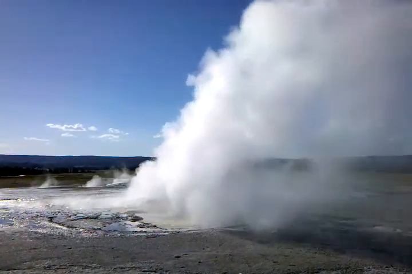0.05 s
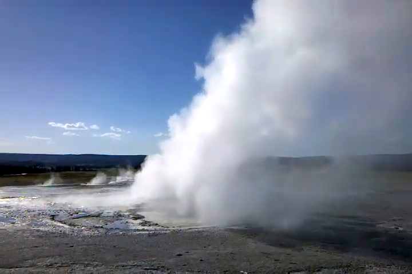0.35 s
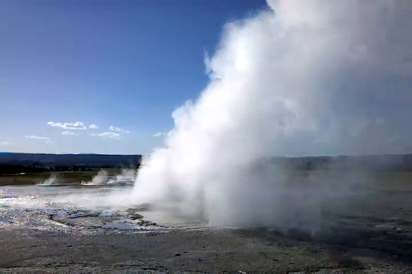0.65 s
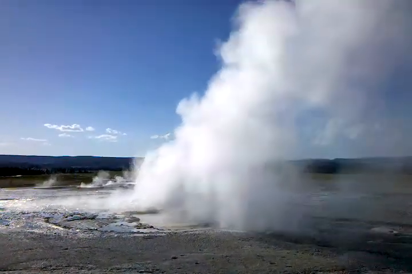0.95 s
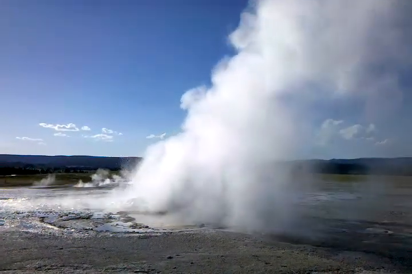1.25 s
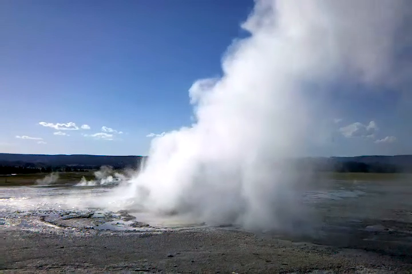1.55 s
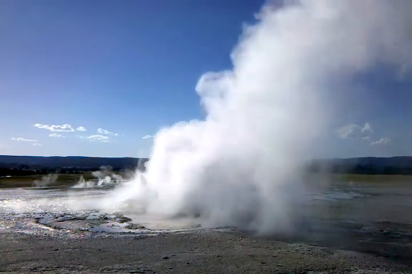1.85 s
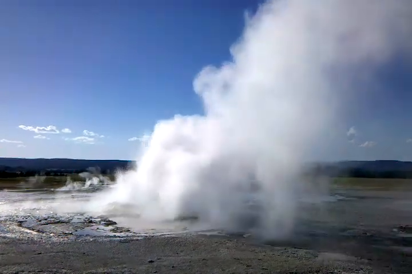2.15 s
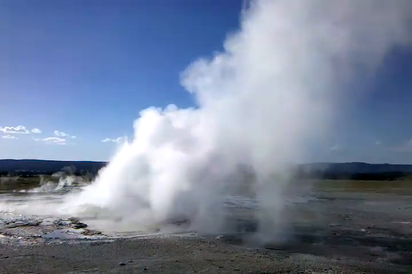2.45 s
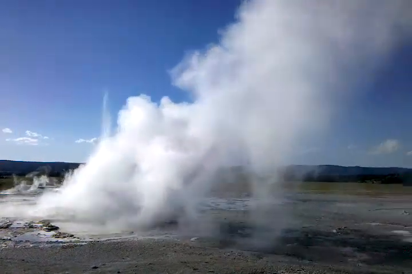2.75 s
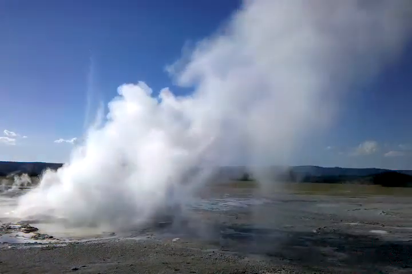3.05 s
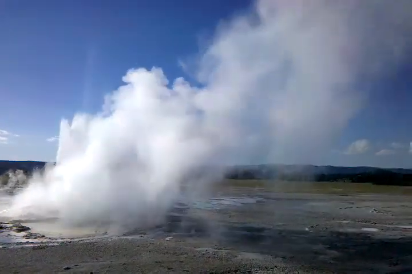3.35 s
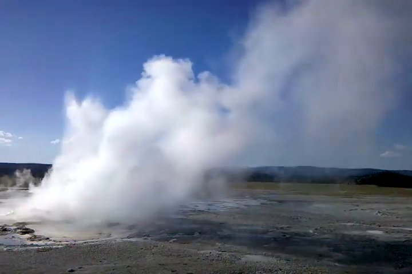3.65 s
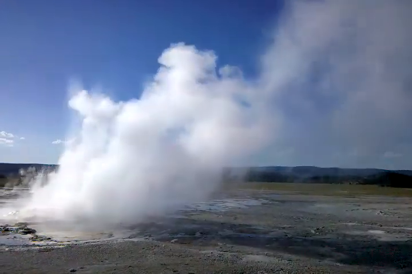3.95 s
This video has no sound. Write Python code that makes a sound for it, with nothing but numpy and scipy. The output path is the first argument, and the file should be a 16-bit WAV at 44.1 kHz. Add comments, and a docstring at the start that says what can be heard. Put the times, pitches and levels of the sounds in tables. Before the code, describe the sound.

A geyser rushes with steam and spray while water splats and wind buffets the microphone.

```python
"""A geyser erupts across a bare sinter flat: steam and spray rush from the vent in slow surges.
The ground mirrors the rush, a hollow colour that drifts as the listener moves.
Thrown water splats down, and one heavy lump plops into the pool.
Wind rumbles and buffets on the microphone of a small camera, whose case is knocked once."""
import sys
import numpy as np
from scipy import signal
from scipy.fft import rfft, irfft
from scipy.io import wavfile
from scipy.ndimage import uniform_filter1d, map_coordinates

SR = 44100
rng = np.random.default_rng(int(sys.argv[2]) if len(sys.argv) > 2 else 0)


def to_wav(s):
    """Save 16-bit WAV."""
    ch = np.atleast_2d(s).T  # columns
    pcm = np.round(np.clip(ch, -1, 1) * 32767)  # PCM
    wavfile.write(sys.argv[1], SR, pcm.astype(np.int16))


N = 176400
T = np.arange(N) / SR

# steady wind on the microphone: time_s, level_db
WIND_LEVEL = [(0, -43), (.5, -47), (.75, -48), (1.3, -46.5), (1.8, -47), (2.35, -49.5), (2.55, -47),
              (2.85, -46.5), (3.1, -40.5), (3.5, -40), (3.7, -44.5), (3.88, -45), (4, -35.5)]
# spectrum of the steady wind: freq_hz, relative_db
WIND_SPECTRUM = [(20, -34.5), (45, -19), (80, -5.5), (130, 1.5), (200, -2.5), (300, -8), (450, -19.5),
                 (800, -43), (1500, -50.5)]
# pressure spectrum of an eddy: freq_hz, relative_db
EDDY_SPECTRUM = [(110, 0.5), (170, 1.5), (330, -6), (700, -12)]
# wind buffets: peak_s, length_s, level_db, high_hz
BUFFET_EVENTS = [(0.005, 0.045, -44, 220), (0.417, 0.02, -39, 180), (0.495, 0.036, -40.5, 180),
                 (0.873, 0.048, -40.5, 450), (1.301, 0.052, -38, 230), (2.023, 0.028, -43, 334),
                 (2.487, 0.036, -37.5, 560), (2.524, 0.014, -38.5, 300), (2.601, 0.011, -36.5, 238),
                 (2.723, 0.032, -38, 224), (2.911, .016, -29, 280), (2.969, 0.072, -34, 470),
                 (3.018, 0.014, -38, 286), (3.062, 0.035, -26, 440), (3.11, 0.025, -29, 560),
                 (3.147, 0.0076, -29, 350), (3.247, 0.017, -21.5, 378), (3.273, 0.03, -29, 305),
                 (3.307, 0.025, -28.5, 400), (3.37, 0.016, -25, 620), (3.398, 0.013, -29, 324),
                 (3.487, 0.014, -26.5, 432), (3.535, 0.014, -30.5, 282), (3.585, 0.039, -27, 278),
                 (3.6, 0.0082, -25, 452), (3.768, 0.0064, -30.5, 262), (3.946, 0.015, -25.5, 289),
                 (3.995, 0.057, -34.5, 495)]
# modes of the camera case: pitch_hz, relative_db, t60_s
CASE_MODES = [(1150, -4, .006), (1600, 0, .009), (2150, -6, .009), (4000, -12, .016)]
# slaps of thrown water: peak_s, length_s, level_db, low_hz, high_hz
SPLAT_EVENTS = [(0.65, 0.025, -46, 720, 1600), (.768, 0.013, -47, 550, 1100), (.855, .012, -44, 450, 1280),
                (0.87, 0.023, -45, 500, 2180), (2.009, 0.01, -47, 800, 3200), (2.032, .01, -50, 1500, 3480),
                (2.11, 0.0062, -40, 1450, 2310), (2.289, 0.0065, -43.5, 1200, 4300),
                (2.419, .006, -50, 3560, 6460), (2.436, 0.031, -47.5, 800, 1610),
                (2.46, 0.021, -46.5, 1300, 2900), (2.474, 0.039, -40.5, 366, 1320),
                (2.556, 0.0049, -45.5, 800, 2500), (2.881, 0.084, -50, 710, 1290),
                (2.943, 0.013, -37, 493, 1890), (2.987, 0.013, -32, 500, 1990),
                (3.032, 0.0073, -35.5, 556, 1400), (3.218, 0.011, -54, 5650, 6460),
                (3.482, 0.014, -42, 596, 1900), (3.713, 0.011, -51, 5800, 6140),
                (3.743, 0.0051, -46, 2300, 3470), (3.929, 0.029, -40, 393, 1680),
                (3.947, 0.013, -50, 3740, 4620), (3.992, .02, -36.5, 350, 890)]
# lag of the ground reflection: time_s, lag_ms
REFLECTION_LAG = [(0, 1.26), (.9, 1.28), (1.7, 1.24), (2.4, 1.21), (3.0, 1.18), (3.5, 1.15), (4, 1.15)]
# surges of the jet, before the roar and spray gains: time_s, roar_db, spray_db
JET_SURGES = [(0.0, -54.5, -59), (0.14, -52.5, -56.5), (0.29, -50.5, -56), (0.56, -54, -60),
              (0.89, -51.5, -58), (1.1, -53.5, -61.5), (1.36, -52.5, -62.5), (1.55, -48.5, -58),
              (1.67, -48, -58), (2.04, -52, -59.5), (2.25, -54, -61), (2.77, -53, -62),
              (3.16, -48.5, -59.5), (3.41, -46.5, -55.5), (3.74, -53, -61.5), (4.0, -56.5, -65.5)]
# spectrum of the steam roar: freq_hz, relative_db
ROAR_SPECTRUM = [(200, -13), (450, 0.5), (800, 1.5), (1200, -3), (1750, -1.5), (2400, -2), (3300, -6),
                 (4400, -11.5), (6000, -36)]
# spectrum of the fine spray: freq_hz, relative_db
SPRAY_SPECTRUM = [(2000, -17.5), (3500, -1), (4500, 1.5), (5400, 6), (6100, 3), (6800, -0.5), (7300, -19),
                  (7800, -36)]


def undb(db):
    """Decibels to gain."""
    return 10 ** (np.asarray(db) / 20)


def unit(x):
    """Scale to rms 1."""
    return x / np.sqrt(np.mean(x ** 2))


def curve(rows, column=1):
    """One table column, interpolated linearly in time."""
    rows = np.array(rows)
    return np.interp(T, rows[:, 0], rows[:, column])


def colour(x, spectrum):
    """Filter by (freq_hz, relative_db) points; rms 1."""
    hz, db = np.array(spectrum).T
    bin_hz = np.maximum(np.arange(N // 2 + 1) * SR / N, 1)
    gain = undb(np.interp(np.log(bin_hz), np.log(hz), db))
    return unit(irfft(rfft(x) * gain, N))


def band(x, low_hz, high_hz, order):
    """Butterworth band-pass."""
    return signal.sosfilt(signal.butter(order, [low_hz, high_hz], "band", fs=SR, output="sos"), x)


def walk(rate_hz):
    """Smooth random drift, rms 1."""
    step = int(SR / rate_hz)
    stairs = np.repeat(rng.standard_normal(N // step + 1), step)
    return unit(uniform_filter1d(stairs, step)[:N])


def drops(per_s, spread_db):
    """Random droplet clicks, a few much larger than the rest."""
    clicks = (rng.random(N) < per_s / SR) * rng.standard_normal(N)
    return clicks * undb(spread_db * np.minimum(rng.exponential(size=N), 2))


def burst(x, peak_s, rise_s, fall_s, level_db):
    """Gaussian swell cut from x, at level_db around its peak."""
    width_s = np.where(T < peak_s, rise_s, fall_s)
    envelope = np.exp(-np.minimum(((T - peak_s) / width_s) ** 2, 100))
    local_rms = np.sqrt(np.sum((x * envelope) ** 2) / np.sum(envelope ** 2))
    return undb(level_db) * envelope * x / local_rms


def churn(x, flicker_db, rate_hz, octaves=7, base_hz=125):
    """Each octave flickers independently; rms 1."""
    spectrum = rfft(x)
    bin_hz = np.maximum(np.arange(N // 2 + 1) * SR / N, 1)
    octave = np.log2(bin_hz / base_hz)
    bands = (irfft(spectrum * np.interp(octave, np.arange(octaves), row), N) for row in np.eye(octaves))
    return unit(sum(part * undb(flicker_db * walk(rate_hz)) for part in bands))


def wind(flutter_db=1.66, buffet_low_hz=97):
    """Fluttering rumble on the microphone; single eddies thump against it."""
    rumble = colour(rng.standard_normal(N), WIND_SPECTRUM)
    flutter = undb(flutter_db * walk(rate_hz=25))
    steady = unit(rumble * flutter) * undb(curve(WIND_LEVEL))
    eddies = colour(rng.standard_normal(N), EDDY_SPECTRUM)
    buffets = np.zeros(N)
    for peak_s, length_s, level_db, high_hz in BUFFET_EVENTS:
        thump = band(eddies, buffet_low_hz, high_hz, order=3)
        buffets += burst(thump, peak_s, 0.63 * length_s, 0.51 * length_s, level_db)
    return steady + buffets


def case_knock(start_s=2.9784, gain_db=-18.5, contact_s=0.0003):
    """One tap, softened by its contact time, rings the camera case for a few milliseconds."""
    age_s = np.maximum(T - start_s, 0)
    ring = sum(undb(db) * np.sin(2 * np.pi * pitch_hz * age_s) * undb(-60 * age_s / t60_s)
               for pitch_hz, db, t60_s in CASE_MODES)
    return undb(gain_db) * ring * np.minimum(age_s / contact_s, 1)


def splats():
    """Lumps of water land, each a short shower of droplets; larger lumps sound lower."""
    slaps = np.zeros(N)
    for peak_s, length_s, level_db, low_hz, high_hz in SPLAT_EVENTS:
        shower = band(drops(per_s=3000, spread_db=4), low_hz, high_hz, order=3)
        slaps += burst(shower, peak_s, 0.35 * length_s, 0.69 * length_s, level_db)
    return slaps


def plop():
    """A heavy lump of water falls into the pool and closes over a pocket of air."""
    hollow = band(rng.standard_normal(N), low_hz=310, high_hz=785, order=4)
    return burst(hollow, peak_s=2.005, rise_s=0.0063, fall_s=0.021, level_db=-33)


def ground_reflection(x, gain=0.36, low_hz=352, high_hz=4900):
    """The flat returns a duller, thinner copy; its lag drifts as the listener moves."""
    dull = signal.sosfiltfilt(signal.butter(2, high_hz, fs=SR, output="sos"), x)
    thin = signal.sosfilt(signal.butter(1, low_hz, "high", fs=SR, output="sos"), dull)
    lag_s = curve(REFLECTION_LAG) / 1000
    return gain * map_coordinates(thin, [(T - lag_s) * SR], mode="mirror")


def camera_turn(x, turn_s=2.4, ease_s=0.3, dip_hz=4540, width_hz=610, depth=0.53):
    """A treble dip fills in as the camera turns away from the vent."""
    facing = 0.5 - 0.5 * np.tanh((T - turn_s) / ease_s)
    return x - depth * facing * band(x, dip_hz - width_hz / 2, dip_hz + width_hz / 2, order=1)


def rush(droplet_gain_db=-5.5):
    """White noise of turbulent steam plus dense droplet clicks."""
    return rng.standard_normal(N) + undb(droplet_gain_db) * unit(drops(per_s=1500, spread_db=4.5))


def geyser_jet(roar_gain_db=2, spray_gain_db=1.5, sputter_db=0.78):
    """Steam roar and fine spray leave the vent, surging and sputtering together."""
    sputter = undb(sputter_db * walk(rate_hz=12))
    roar = churn(colour(rush(), ROAR_SPECTRUM), flicker_db=0.6, rate_hz=60)
    roar *= undb(curve(JET_SURGES, column=1) + roar_gain_db)
    spray = churn(colour(rush(), SPRAY_SPECTRUM), flicker_db=0.75, rate_hz=35)
    spray *= undb(curve(JET_SURGES, column=2) + spray_gain_db)
    return sputter * (roar + spray)


def scene():
    """Mono mix: geyser, falling water, noises at the microphone."""
    jet = geyser_jet()
    geyser = camera_turn(jet + ground_reflection(jet))
    return (geyser + splats() + plop() + wind() + case_knock())[None]


def record(dry):
    """The camera drops the deep bass and cuts the top steeply."""
    low_hz, high_hz = 45, 7400
    thin = signal.sosfilt(signal.butter(2, low_hz, "high", fs=SR, output="sos"), dry)
    return signal.sosfilt(signal.ellip(8, 0.2, 70, high_hz, fs=SR, output="sos"), thin)


dry = scene()
out = record(dry)
to_wav(out)
```